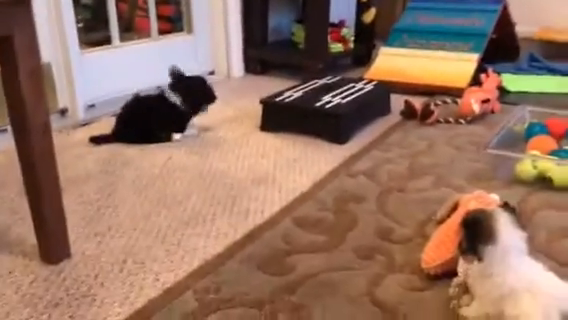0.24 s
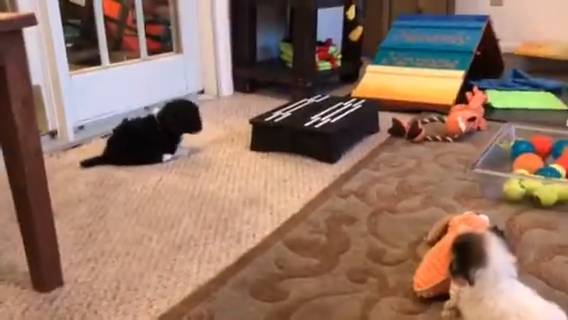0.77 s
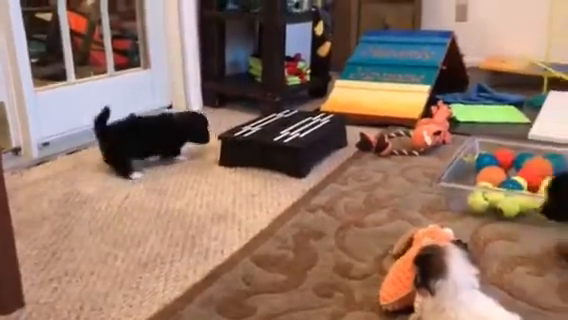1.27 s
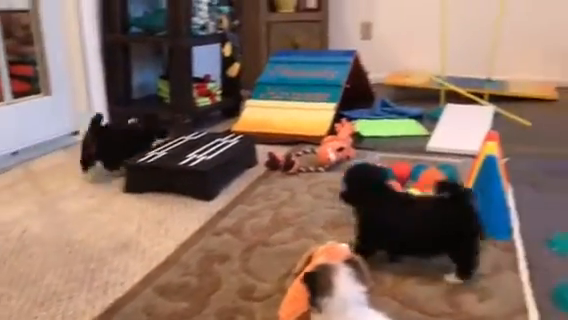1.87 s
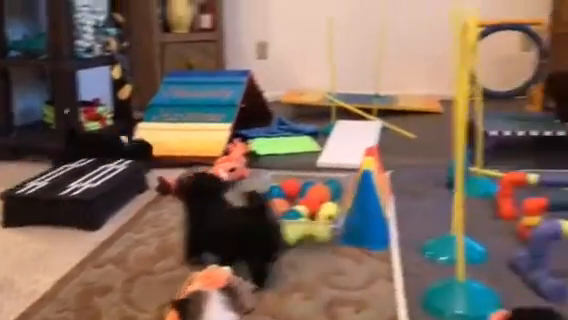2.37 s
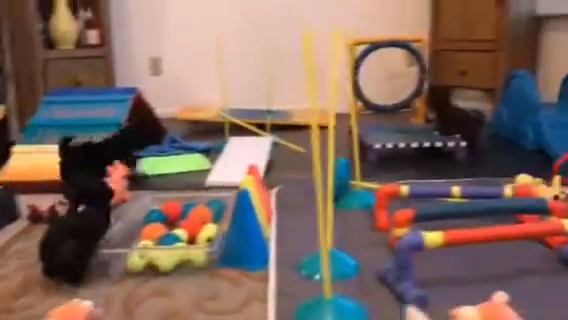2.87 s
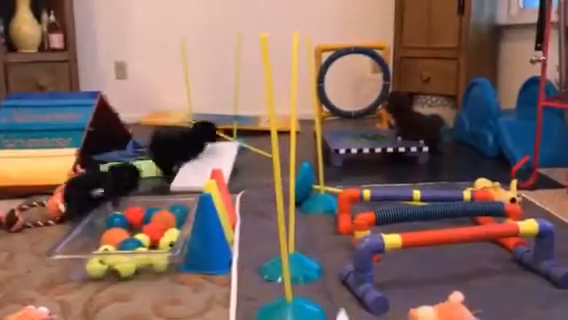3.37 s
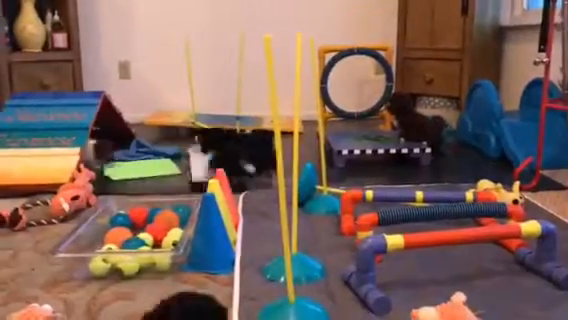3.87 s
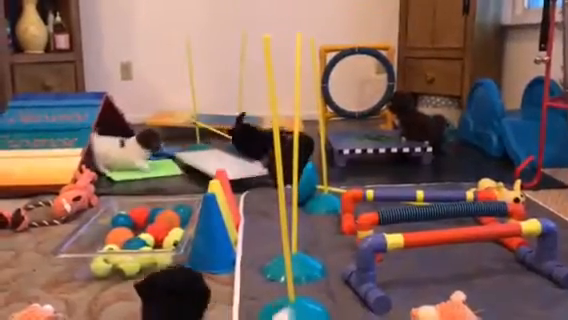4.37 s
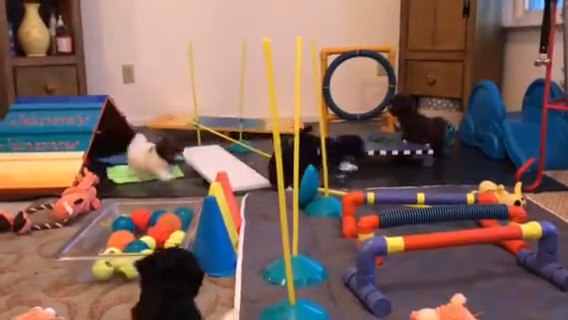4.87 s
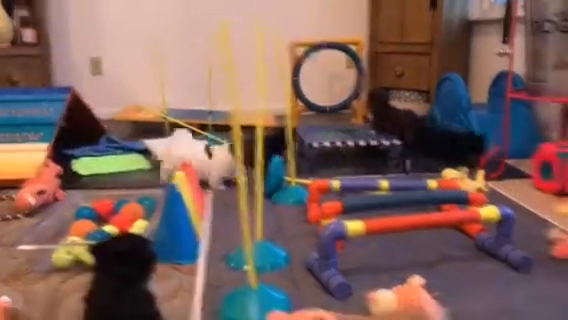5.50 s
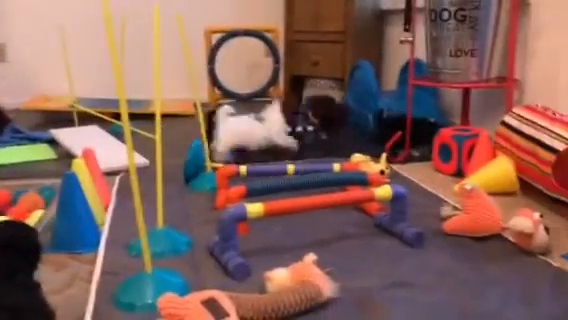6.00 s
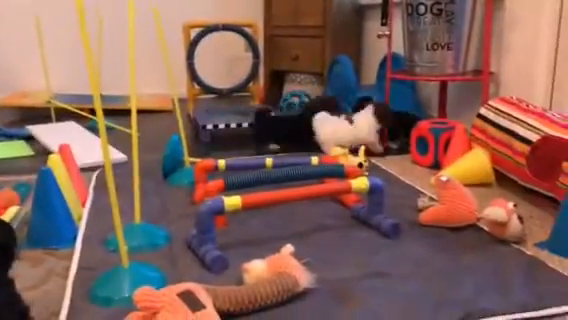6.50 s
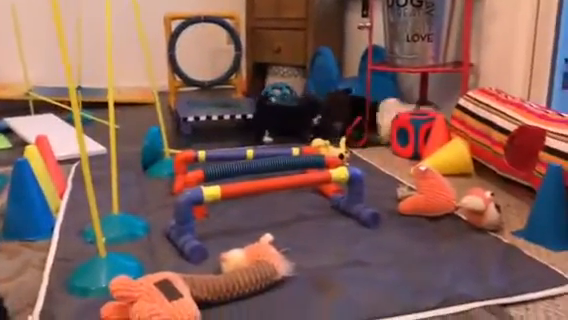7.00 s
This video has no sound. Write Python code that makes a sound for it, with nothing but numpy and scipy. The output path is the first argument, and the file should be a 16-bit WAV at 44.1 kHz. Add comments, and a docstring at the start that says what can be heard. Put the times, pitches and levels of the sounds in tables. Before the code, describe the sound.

Small dogs play indoors among plastic agility pieces. First come a few soft thuds and close fabric-like swishes over a faint room hush, with a low purring flutter. Padding grows busier, with dull plastic taps, and a tipping board cracks hard on the floor, rattling briefly, then lands again more softly. Busy muffled footfalls follow, then swishes and a gentle flutter to the end, with short room reflections.

```python
"""Puppies play on small agility equipment in a carpeted, very quiet room, heard from a hand-held phone.
Paws thump, fur and plush swish close by and a plastic piece clatters; a soft low flutter comes and goes.
The steps thicken, then a little seesaw tips over and falls back: two sharp cracks, a rattle, a floor boom.
More paws and clatters follow, then a last run of swishes, and the flutter returns until the end.
Knocks are filtered noise and decaying sines, swishes shaped noise, the flutter a train of rounded tones."""
import sys
import numpy as np
from scipy import signal
from scipy.fft import rfft, irfft
from scipy.io import wavfile
from scipy.ndimage import uniform_filter1d

SR = 44100
rng = np.random.default_rng(int(sys.argv[2]) if len(sys.argv) > 2 else 0)


def wav_record(signal):
    """Record a signal, one row per channel, as 16-bit PCM in the file named by sys.argv[1]."""
    frames = np.transpose(np.atleast_2d(signal))
    bounded = np.clip(frames, -1, 1)
    # unit amplitude maps onto the largest positive 16-bit level
    quanta = np.round(bounded * 32767).astype(np.int16)
    wavfile.write(sys.argv[1], SR, quanta)


N = 319725
TIME = np.arange(N) / SR
AGE = TIME[:SR * 3 // 4]  # time since the start of an event

# seesaw landings: (time [s], edge crack level [dB], crack tilt [dB per octave],
# step from each edge contact to the next [dB], panel rattle level [dB], rattle tilt [dB per octave],
# rattle low cut [Hz], ring level [dB], floor boom level [dB], centre of the favoured modes [Hz])
LANDINGS = [(3.73, -11.5, 3.5, -3.5, -25, 2.4, 49.5, -30, -32, 1066),
            (4.2176, -16, -1, -35, -30, 0.7, 266, -45, -39, 538)]
# soft pad on the mat, a spectrum: (frequency [Hz], relative level [dB])
PAD_SPECTRUM = [(60, -15.5), (150, 5.5), (300, 2.5), (500, -6), (800, -15), (1500, -30), (3000, -51),
                (8000, -75.5)]

FLOOR_HZ, ROOM_T60_S = 62, 0.42
TOP_HZ = 15800  # upper limit of the phone


def undb(db):
    """Decibels to gain."""
    return 10 ** (np.asarray(db) / 20)


def unit(x):
    """Scale to rms 1."""
    return x / np.sqrt(np.mean(x ** 2) + 1e-30)


def burst(x, size=256):
    """Scale so that the loudest stretch of size samples has rms 1."""
    return x / np.sqrt(uniform_filter1d(x ** 2, size).max() + 1e-30)


def add(out, s, x):
    """Mix x into out from time s."""
    i = max(int(s * SR), 0)
    out[i:i + len(x)] += x[:max(N - i, 0)]


def colour(x, points, tilt_db=0, size=2048):
    """Causal minimum-phase filter through (Hz, dB) points, tilted by some dB per octave."""
    hz, db = np.transpose(points)
    octave = np.log2(np.maximum(np.arange(size // 2 + 1), .5) * SR / size)
    gain_db = np.interp(octave, np.log2(hz), db + tilt_db * np.log2(hz / hz[0]))
    # folding the cepstrum onto positive time puts the energy as early as possible
    cepstrum = irfft(gain_db * np.log(10) / 20)
    cepstrum[1:size // 2] *= 2
    cepstrum[size // 2 + 1:] = 0
    response = irfft(np.exp(rfft(cepstrum)))
    return signal.fftconvolve(x, response)[:len(x)]


def band(x, hz, width_hz):
    """One resonance, gain 1 at its centre."""
    return signal.lfilter(*signal.iirpeak(min(hz, SR / 2 - 1), hz / width_hz, SR), x)


def fade(t60):
    """Exponential decay by 60 dB in t60 seconds."""
    return np.exp(-np.log(1000) * AGE / t60)


def noises(events):
    """A row of white noise for each event."""
    return rng.standard_normal((len(events), len(AGE)))


def grains(rate, spread_db):
    """Random tiny contacts of uneven size, at a mean rate per second."""
    chance, size, sign = rng.random(N), rng.standard_normal(N), rng.standard_normal(N)
    return (chance < rate / SR) * undb(spread_db * size) * np.sign(sign)


def room(x):
    """Reflections build up over some milliseconds and die away, the treble first."""
    noise = rng.standard_normal(len(AGE))
    low = signal.sosfilt(signal.butter(2, 5000, fs=SR, output="sos"), noise)
    high = signal.sosfilt(signal.butter(2, 5000, "high", fs=SR, output="sos"), noise)
    build_up = 1 - np.exp(-(AGE / .008) ** 2)
    response = (low * fade(ROOM_T60_S) - 0.85 * high * fade(0.27)) * build_up
    return signal.fftconvolve(x, response / np.linalg.norm(response))[:N]


def air():
    """The quiet room's steady hush is coloured noise."""
    # room hush, a spectrum: (frequency [Hz], relative level [dB])
    air_spectrum = [(25, -18.5), (40, -20.5), (64, 7), (134, 2.5), (350, -22.5), (600, -27.5),
                    (2300, -22.5), (7500, -27.5), (13000, -29.5), (16000, -28.5)]
    return undb(-68) * unit(colour(rng.standard_normal(N), air_spectrum))


def flutter():
    """A soft low purring: a train of short rounded bursts, no two alike, each with a puff of noise."""
    # bouts: (start [s], end [s], pulse rate [per s], tone [Hz], relative level [dB])
    bouts = [(1.362, 1.78, 28, 280, -53), (2.02, 2.52, 33, 124, -54.5), (6.122, 7.6, 27.3, 288, -52)]
    attack_s, release_s, uneven_db = .08, .28, .8
    out = np.zeros(N)
    for start, end, rate, hz, db in bouts:
        cycle = rate * np.maximum(TIME - start, 0)
        phase = cycle % 1
        # each pulse has its own size and pitch
        size, detune = rng.standard_normal((N // 1000, 2))[cycle.astype(int)].T
        swell = np.clip(np.minimum((TIME - start) / attack_s, (end - TIME) / release_s), 0, 1)
        gate = np.sin(np.pi * phase) ** 3 * swell
        turn = 2 * np.pi * hz * (1 + 0.045 * detune) * phase / rate
        tone = np.sin(turn) + undb(-16.5) * np.sin(turn / 2)
        puff = unit(colour(rng.standard_normal(N), PAD_SPECTRUM, tilt_db=-0.5))
        out += undb(db + 1.0 + uneven_db * size) * gate * (tone + undb(-12.0) * puff)
    return out


def bustle():
    """Many small steps keep the floor rumbling and pad on the carpet; scuffing grows with the padding."""
    # course of the bustle: (time [s], relative floor rumble level [dB], relative padding level [dB])
    course = [(0.0, -55, -68.5), (0.46, -76, -79), (0.77, -80, -72.5), (1.01, -63, -74), (1.49, -67, -65.5),
              (1.71, -74, -79), (2.08, -64.5, -78), (2.77, -56.5, -65), (3.74, -57.5, -68.5),
              (3.88, -44, -63.5), (4.18, -76, -67.5), (4.48, -65, -79.5), (5.25, -56.5, -63),
              (5.35, -53, -65), (5.94, -52.5, -57.5), (6.3, -53, -61), (6.66, -70.5, -65),
              (7.25, -73.5, -69.5)]
    # scuffing, a spectrum: (frequency [Hz], relative level [dB])
    scuff_spectrum = [(350, -7.5), (600, -3), (1260, -5.5), (1550, -7), (2470, -12), (9620, -19),
                      (15100, -22.5), (16000, -43.5)]
    scuff_mean_db, scuff_growth = -74, 0.32  # at the mean padding level; dB for each dB more
    s, *columns = np.transpose(course)
    rumble_db, pad_db = (np.interp(TIME, s, c) for c in columns)
    scuff_db = scuff_mean_db + scuff_growth * (pad_db - pad_db.mean())
    floor = [(20, -19), (35, -10), (50, -4), (FLOOR_HZ, 0), (78, -6), (110, -13), (250, -36), (1000, -70)]  # (Hz, dB)
    rumble = unit(colour(grains(200, 2), floor, size=8192))
    padding = unit(colour(grains(90, 4.5), PAD_SPECTRUM, tilt_db=0.5))
    scuffs = unit(colour(grains(3000, 3.9), scuff_spectrum))
    steps = undb(pad_db + 1.5) * padding + undb(scuff_db) * scuffs
    return undb(rumble_db - 2.0) * rumble + steps + undb(-2.5) * room(steps)


def floor_boom():
    """Two close floor modes swell slowly and beat."""
    beating = np.sin(2 * np.pi * FLOOR_HZ * AGE) - 0.43 * np.sin(2 * np.pi * 73 * AGE)
    swell = 1 - np.exp(-(AGE / .025) ** 2)
    return burst(swell * fade(0.33) * beating, size=1024)


def paws():
    """A soft pad gives a thud of a few cycles; the mat shudders, claws add a dull tick and the floor booms faintly."""
    # heavier paw falls: (time [s], relative level [dB], thud [Hz], relative claw level [dB])
    falls = [(0.084, -78.5, 131, -78), (0.362, -37.5, 221, -48), (0.498, -42, 160, -65),
             (1.976, -54, 131, -81), (2.288, -55.5, 367, -56.5), (2.382, -45.5, 130, -82),
             (2.512, -50, 168, -49), (2.633, -56.5, 303, -49.5), (2.782, -53, 258, -44.5),
             (2.911, -45.5, 157, -45.5), (2.932, -46.5, 143, -61.5), (3.034, -41, 323, -82),
             (3.098, -44.5, 138, -78), (3.201, -34, 292, -41), (3.255, -38.5, 283, -58),
             (3.34, -41, 226, -51), (3.455, -37, 145, -50), (3.496, -44.5, 231, -56),
             (3.669, -38.5, 213, -65), (3.983, -85, 242, -55), (4.077, -38, 237, -48.5),
             (4.329, -33, 363, -37.5), (4.564, -42.5, 350, -51.5), (4.645, -37.5, 244, -82),
             (4.659, -50, 359, -68), (4.692, -35.5, 237, -39.5), (4.888, -43, 300, -51),
             (4.922, -40.5, 365, -49.5), (4.959, -37, 279.5, -55.5), (5.165, -45.5, 292, -70),
             (5.214, -41, 330, -82.5), (5.249, -37, 137, -56.5), (5.313, -42, 147.7, -53),
             (5.445, -41.5, 143, -49), (5.582, -47, 136, -53), (5.655, -61, 264, -70),
             (5.746, -44, 159, -59), (5.978, -40, 290, -43), (6.208, -48, 230, -52.5),
             (6.311, -44, 288, -52.5), (6.341, -36, 314, -73), (6.362, -40.5, 320, -50),
             (6.641, -42.5, 287, -75), (7.226, -43, 151, -51.5)]
    thud_db, mat_db, claw_trim_db = -7, -12.5, -2  # against the levels of the row
    overtone_ratio, overtone_db = 1.8, -11  # a second, shorter mode of the mat
    shake_db, shake_limit_db = -13.5, -63  # floor boom: against the level of the row; at most
    pad_attack_s = .003  # the pad flattens against the mat
    thuds, scuffs, shakes = np.zeros((3, N))
    boom = floor_boom()
    for (s, db, hz, claw_db), noise in zip(falls, noises(falls)):
        tone = np.sin(2 * np.pi * hz * AGE) * fade(0.076)
        overtone = undb(overtone_db) * np.sin(2 * np.pi * overtone_ratio * hz * AGE) * fade(0.068)
        thud = burst((tone + overtone) * (1 - np.exp(-AGE / 0.0014)))
        mat = burst(colour(noise, PAD_SPECTRUM) * fade(0.13))
        claw = burst(band(band(noise, 460, 780), 460, 780) * fade(0.077))
        press = 1 - np.exp(-AGE / pad_attack_s)
        add(thuds, s, undb(db + thud_db) * thud)
        add(scuffs, s, press * (undb(db + mat_db) * mat + undb(claw_db + claw_trim_db) * claw))
        add(shakes, s, undb(min(db + shake_db, shake_limit_db)) * boom)
    return thuds + scuffs + shakes + undb(-2.5) * room(scuffs + .5 * thuds)


def swishes():
    """Fibres slip in dense tiny catches; each stroke starts quickly, eases off and gives the floor a small shove."""
    # strokes of fur and plush: (time [s], length [s], level [dB], brightness tilt [dB per octave])
    strokes = [(0.164, 0.091, -63.5, -2), (0.367, 0.066, -46.5, 7), (0.468, 0.084, -57, -4.5),
               (0.673, 0.041, -65.5, -1), (0.737, 0.16, -62.5, -1.5), (0.908, 0.086, -51.5, -1.5),
               (1.051, 0.095, -50, -0.55), (1.276, 0.061, -52, 0), (1.396, 0.024, -50.5, -3.5),
               (1.518, .13, -57.5, -0.5), (3.211, .044, -56, 7), (4.345, 0.053, -55, 7),
               (5.711, 0.16, -61, -4.5), (5.841, 0.049, -49, -2.5), (5.941, 0.077, -46.5, -1.3),
               (6.029, 0.079, -55, -3)]
    # fur, a spectrum: (frequency [Hz], relative level [dB])
    fur_spectrum = [(120, -27), (200, -18.5), (289, -11.5), (387, -14.5), (538, -10), (916, -14.5),
                    (1020, -9), (1370, -13.5), (2170, -10), (2560, -13), (3370, -8), (10500, -18.5),
                    (14100, -20), (16000, -31)]
    # the brighter the stroke, the higher and stronger its whistling band
    whistle_hz, whistle_db = 3140, -15  # at zero tilt
    octaves_per_tilt, db_per_tilt = 0.13, 1.76
    whistle_width = .15  # share of its frequency
    rise_share = 0.096  # rise time constant as a share of the length
    shove_db, shove_lag_s = -59.5, 0.013  # level for a stroke of a tenth of a second; delay
    out, shoves = np.zeros((2, N))
    boom = floor_boom()
    for (s, length, db, tilt_db), noise, uneven in zip(strokes, noises(strokes), noises(strokes)):
        hz = whistle_hz * 2 ** (octaves_per_tilt * tilt_db)
        peak_db = whistle_db + db_per_tilt * tilt_db
        slips = noise * undb(4.2 * uneven)
        fur = unit(colour(slips, fur_spectrum, tilt_db))
        whistle = unit(band(slips, hz, whistle_width * hz))
        hiss = unit(fur + undb(peak_db) * whistle)
        stroke = (1 - np.exp(-AGE / (rise_share * length))) * np.exp(-(AGE / length) ** 4)
        add(out, s, undb(db) * stroke * hiss)
        add(shoves, s + shove_lag_s, undb(shove_db) * 10 * length * boom)
    return out + shoves + undb(-6.5) * room(out)


def clatters():
    """A touched plastic piece chatters through quick contacts and rings briefly; short runs are dull, long ones bright."""
    # light clatters: (time [s], relative level [dB], length [s], ring [Hz], ring against shell [dB])
    runs = [(0.3587, -48, 0.015, 1750, -7), (2.452, -62.5, 0.0051, 607, -1), (2.506, -62, 0.026, 940, 12),
            (2.728, -58.5, 0.06, 1050, 3), (2.777, -45.5, 0.055, 1287, 0), (3.199, -41.5, 0.008, 987, 9.5),
            (3.413, -59.5, 0.0068, 900, 1), (3.496, -55.5, .012, 2750, 5), (3.501, -59, .036, 1800, 6),
            (3.509, -54, 0.044, 1046, 11.5), (3.583, -64.5, 0.11, 1040, -19),
            (4.04, -45.5, 0.065, 1530, -23.5), (4.548, -62, 0.011, 790, 6), (4.644, -49, 0.0032, 536, -0.5),
            (4.659, -51, 0.0092, 636, 3), (4.693, -45.5, 0.038, 1747, -24), (5.585, -61.5, 0.017, 1420, 5),
            (6.305, -65, 0.025, 1742, -4), (6.516, -67, .022, 1590, -5), (6.742, -67.5, 0.027, 1605, -2.5)]
    # plastic shell, a spectrum: (frequency [Hz], relative level [dB])
    plastic_spectrum = [(120, -53.5), (200, 3), (245, -3), (416, 0.5), (623, -3.5), (1060, -4), (1160, -13),
                        (1270, -1), (1530, 1), (2750, -5), (4950, -19.5), (11300, -33), (16000, -30.5)]
    neutral_s, tilt_per_doubling_db = 0.034, 5  # length with no tilt; dB per octave per doubling of it
    rise_share, uneven_db = 0.13, 4.5  # rise time constant as a share of the length; spread of contacts
    soft_contact_hz = 9000  # top of a run of neutral length; it goes with the root of the length
    touch_lead_s, touch_db = 0.0065, -17.5  # a light touch comes just before the weight
    out = np.zeros(N)
    for (s, db, length, hz, ring_db), noise, uneven in zip(runs, noises(runs), noises(runs)):
        tilt_db = tilt_per_doubling_db * np.log2(length / neutral_s)
        envelope = (1 - np.exp(-AGE / (rise_share * length))) * np.exp(-(AGE / length) ** 2)
        contacts = noise * undb(uneven_db * uneven) * envelope
        top_hz = min(soft_contact_hz * np.sqrt(length / neutral_s), TOP_HZ)
        contacts = signal.lfilter(*signal.butter(2, top_hz, fs=SR), contacts)
        shell = colour(contacts, plastic_spectrum, tilt_db)
        shell = signal.sosfilt(signal.butter(2, 550, "high", fs=SR, output="sos"), shell)
        ring = band(contacts, hz, 110) + undb(-18.5) * band(contacts, 1.15 * hz, 60)
        knock = undb(db) * burst(burst(shell) + undb(ring_db) * burst(ring))
        add(out, s, knock)
        add(out, s - touch_lead_s, undb(touch_db) * knock)
    return undb(1) * (out + undb(-6.5) * room(out))


def edge_contact(tilt_db, hz, ring_db):
    """One hard contact: a crack and a ring that dies within a few cycles."""
    # edge crack, a spectrum: (frequency [Hz], relative level [dB])
    crack_spectrum = [(100, 0), (300, -15.5), (650, -28.5), (1050, -22.5), (1400, -19), (2000, -13),
                      (2600, 0.5), (3400, -7.5), (4800, -18), (7000, -28.5), (10000, -35.5), (16000, -51.5)]
    impulse = 1. * (AGE == 0)
    crack = colour(impulse, crack_spectrum, tilt_db)
    ring = np.sin(2 * np.pi * hz * AGE) * fade(14 / hz)
    return crack / np.abs(crack).max() + undb(ring_db) * ring


def edge_cracks(count=4):
    """At each landing the edge chatters in a few ever weaker contacts, then the board comes down once more."""
    chatter_gap_s, chatter_power = .0012, .8  # first gap; a power under 1 draws contacts ever closer
    edge_hz, edge_db = 2660, 0.5  # brief ring of the struck edge; against its crack
    rebound_s, rebound_db, rebound_ring_db = .013, -17, 9  # delay; against the first crack; its ring
    out = np.zeros(N)
    for s, db, tilt_db, step_db, *_, favoured_hz in LANDINGS:
        for k in range(count):
            contact = undb(db + k * step_db) * edge_contact(tilt_db, edge_hz, edge_db)
            add(out, s + chatter_gap_s * k ** chatter_power, contact)
        rebound = edge_contact(tilt_db, favoured_hz, rebound_ring_db)
        add(out, s + rebound_s, undb(db + rebound_db) * rebound)
    return out


def seesaw():
    """The board's edge cracks on the floor, the panel rattles and rings, and the floor booms a moment later."""
    # modes of the board: (frequency [Hz], relative level [dB], decay by 60 dB [s])
    board_modes = [(291.5, 15.5, 0.1), (390.2, 4.5, 0.54), (558, -23, 0.13), (1000, -37.5, .25),
                   (1040, -21, .18), (1050, 18.5, 0.2), (1170, -29, .28), (1280, 9, 0.21), (1485, -17, .2),
                   (1750, -4.5, 0.93), (1774, 6.5, 0.295), (1894, -3.5, 0.27), (2270, 9.5, 0.25),
                   (2661, -34, 0.19), (3190, 8.5, 0.44), (2940, -17.5, .3), (4180, 2.5, 0.38)]
    # panel rattle, a spectrum: (frequency [Hz], relative level [dB])
    panel_spectrum = [(53, -13.5), (90, -8), (151, -3), (284, 4.5), (457, -9), (556, -4), (620, -12),
                      (1070, -3.5), (1350, -14.5), (1720, -7.5), (2430, -13.5), (4170, -21), (4860, -29),
                      (8720, -41.5), (16000, -63)]
    favour_db, favour_width = -8.5, 0.34  # extra rattle around the favoured modes; share of their frequency
    cracks, body = edge_cracks(), np.zeros(N)
    phases = rng.uniform(0, 2 * np.pi, (len(LANDINGS), len(board_modes)))
    draws = zip(LANDINGS, noises(LANDINGS), noises(LANDINGS), phases)
    for landing, noise, uneven, phase in draws:
        s, *_, panel_db, tilt_db, lowest_hz, ring_db, boom_db, favoured_hz = landing
        # countless crowded modes merge into a noisy rattle
        contacts = noise * undb(2 * uneven) * fade(ROOM_T60_S)
        favoured = band(contacts, favoured_hz, favour_width * favoured_hz)
        contacts = contacts + undb(favour_db) * favoured
        contacts = signal.lfilter(*signal.butter(2, lowest_hz, "high", fs=SR), contacts)
        panel = burst(colour(contacts, panel_spectrum, tilt_db), size=1024)
        # where the board lands decides which modes ring most
        hz, db, t60 = np.transpose(board_modes)[:, :, None]
        db = db + 5 * np.exp(-(np.log2(hz / favoured_hz) / 0.39) ** 2)
        modes = undb(db) * fade(t60) * np.sin(2 * np.pi * hz * AGE + phase[:, None])
        ring = burst(np.sum(modes, axis=0) * (1 - np.exp(-AGE / .003)), size=1024)
        add(body, s, undb(panel_db) * panel + undb(ring_db) * ring + undb(boom_db) * floor_boom())
    return cracks + body + undb(-10) * room(cracks)


def scene():
    """Everything at one microphone."""
    return (air() + flutter() + bustle() + paws() + swishes() + clatters() + seesaw())[None]


def record(dry):
    """The phone thins the deepest bass and cuts the top."""
    dry = signal.sosfilt(signal.butter(2, 28, "high", fs=SR, output="sos"), dry)
    return signal.sosfilt(signal.ellip(10, .2, 70, TOP_HZ, fs=SR, output="sos"), dry)


dry = scene()
out = record(dry)
wav_record(out)
```